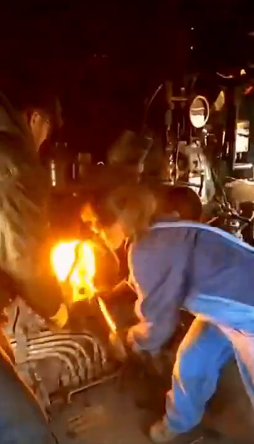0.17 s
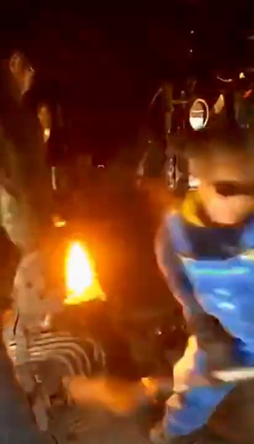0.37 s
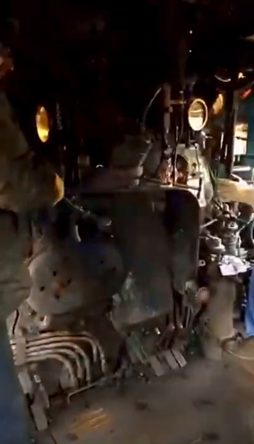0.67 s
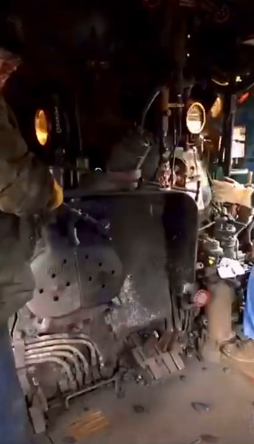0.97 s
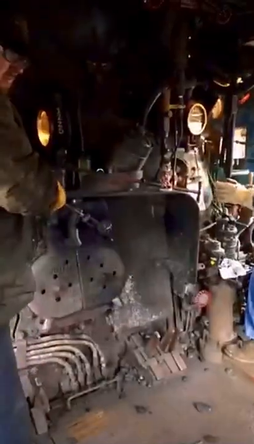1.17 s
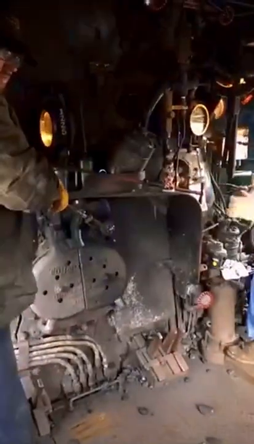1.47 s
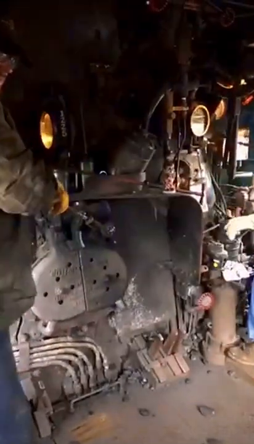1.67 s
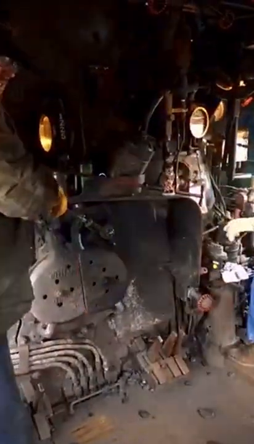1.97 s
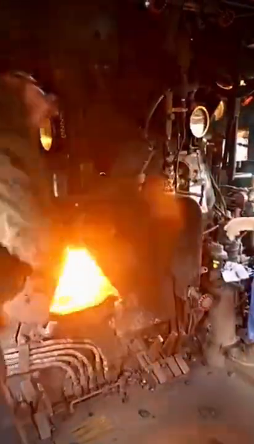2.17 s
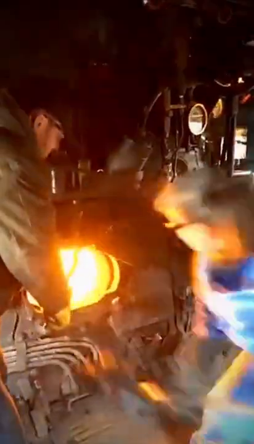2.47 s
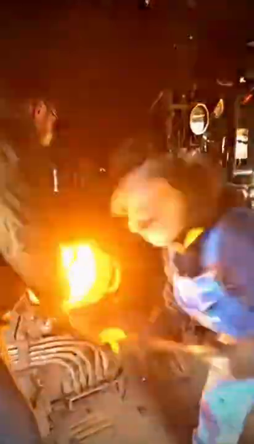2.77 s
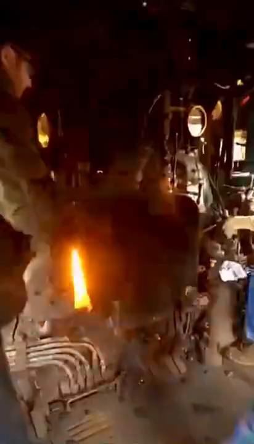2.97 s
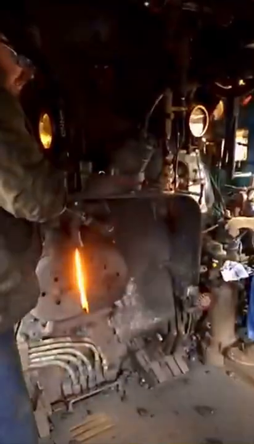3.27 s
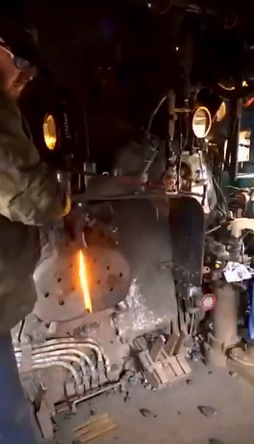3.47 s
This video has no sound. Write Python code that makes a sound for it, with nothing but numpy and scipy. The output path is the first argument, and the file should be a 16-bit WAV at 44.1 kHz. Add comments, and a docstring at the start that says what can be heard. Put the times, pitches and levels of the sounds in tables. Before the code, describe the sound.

Bright rushing hiss from an open locomotive firebox, cut off by clanking doors, amid shovel scrapes

```python
"""In the cab of a steam locomotive the fire doors stand open at first: the draught hisses brightly (shaped noise) and
the shovel scrapes in coal (grit coloured by a ringing blade), until the iron doors clank shut (noisy blows on ringing
modes). More scraping follows, then dull knocks (noise bursts, low thumps). The doors clank open, the draught returns
for another scrape, they clank shut; a thin, faint high tone (narrow noise) and a last scrape follow. Throughout, steam
leaks (noise, fuzzy whistles) and the cab rumbles (low noise); short echoes of the steel cab follow blows and grit."""
import sys
import numpy as np
from scipy import signal
from scipy.fft import rfft, irfft
from scipy.io import wavfile
from scipy.ndimage import uniform_filter1d

SR = 44100
rng = np.random.default_rng(int(sys.argv[2]) if len(sys.argv) > 2 else 0)


def master_out(mix):
    """Clip the mix to full scale and print it as 16-bit PCM to the path in sys.argv[1]."""
    frames = np.transpose(np.atleast_2d(mix))
    ceiling = np.clip(frames, -1, 1)
    pcm = np.round(ceiling * 32767).astype(np.int16)
    wavfile.write(sys.argv[1], SR, pcm)


N = 159642  # length in samples


def draught():
    """Air rushing through the open fire doors makes a smooth, bright hiss."""
    # One curve for each opening of the doors: (time [s], level [dB])
    draught_levels = [
        [(0, -31.5), (.15, -31), (.31, -32), (.33, -30.5), (.43, -31.5), (.47, -35.5), (.54, -47)],
        [(2.11, -41), (2.13, -31.5), (2.22, -29.5), (2.27, -32.5), (2.29, -30.5), (2.6, -32), (2.79, -31.5),
         (2.82, -30.5), (2.97, -31), (3.05, -44.5)],
    ]
    # Spectrum of the rushing air: (frequency [Hz], relative density [dB per Hz])
    draught_colour = [(400, -27.5), (900, -5), (2500, -5), (3300, -0.5), (5900, 3), (10300, 4), (11200, 4)]
    air = hiss(draught_colour, patchy_db=1.2, flicker_db=0.6, size=512)
    return air * sum(level(opening) for opening in draught_levels)


def clanks():
    """A rough blow and the rattle after it drive the modes of the doors, inside a dense crash of iron."""
    # Iron doors struck and rebounding:
    # (time [s], level [dB], brightness [dB per octave], extra level of the deepest ring [dB])
    door_blows = [(0.5458, -28.5, -1.5, -16), (.571, -40.5, -2, -6), (2.0411, -32.5, 1, 1),
                  (2.0475, -28.5, -2.5, 5.5), (2.07, -39, -2, 5), (3.0517, -25.5, 0.5, -26),
                  (3.072, -34.5, -5.5, -10), (3.097, -44, 4, -10)]
    # Ringing modes of the doors: (frequency [Hz], relative level [dB], time to fade by 60 dB [s])
    door_modes = [(388, -10, .06), (555, -11, .05), (805, -8, .035), (945, 0.5, .048), (1190, -4, .045),
                  (1355, 1.5, .04), (1600, -2, .035), (1820, -2.5, .045), (2140, -6, .035), (2680, -8, .04),
                  (3210, -8, .045), (3490, -7, .035)]
    # Spectrum of the crash: (frequency [Hz], relative density [dB per Hz])
    crash_colour = [(300, -26), (900, 10), (1800, 13.5), (3500, 4.5), (6000, 0.5), (11200, -11.5)]
    blow_s, rattle_s = 0.0045, 0.0069  # time to the peak of each
    rattle_db, crash_db = -16, -1.5  # rattle against blow, crash against ring
    deep_hz = 480  # the deepest ring lies below this
    out = np.zeros(N)
    t = np.arange(SR // 4) / SR
    for start_s, level_db, tilt_db, deep_db in door_blows:
        def tone(hz):
            return tilt_db * np.log2(hz / 1000) + deep_db * (hz < deep_hz)

        # uneven contacts, one every 128 samples (3 ms)
        strengths = rng.uniform(0.3, 1, len(t) // 128 + 1)
        contacts = evened(np.repeat(strengths, 128)[:len(t)])
        push = swell(t, blow_s) + amp(rattle_db) * swell(t, rattle_s) * contacts
        ring = 0
        for hz, mode_db, t60 in door_modes:
            mode = amp(mode_db + tone(hz) - 60 * t / t60) * np.sin(2 * np.pi * hz * t)
            rough_push = push * rng.standard_normal(len(t))
            struck = signal.fftconvolve(rough_push, mode)[:len(t)]
            ring += struck * np.linalg.norm(mode) / np.linalg.norm(struck)
        ring *= np.linalg.norm(push) / np.linalg.norm(ring)  # as much energy as the push
        toned_colour = [(hz, density_db + tone(hz)) for hz, density_db in crash_colour]
        crash = push * coloured(toned_colour, count=len(t))
        add(out, start_s, amp(level_db) * (ring + amp(crash_db) * crash))
    return out


def scrape():
    """Grains of grit of uneven size, coloured by the blade; its ring moves through the stroke."""
    # Strokes of the shovel through coal, one list each:
    # (time [s], level [dB], ring of the blade [Hz], relative height of the ring [dB])
    strokes = [
        [(.06, -49, 900, -11), (.175, -37, 1550, 9), (.235, -37.5, 1280, 8), (.29, -48, 1200, -3)],
        [(.865, -46, 900, -6), (.89, -35.5, 1000, 1), (.925, -32, 1600, 2.5), (.99, -34, 1140, -1),
         (1.06, -38.5, 780, 11), (1.11, -49.5, 800, 0)],
        [(2.595, -39, 900, 11), (2.615, -37.5, 1000, 6), (2.637, -37.5, 1900, 3), (2.665, -35, 2010, 9),
         (2.69, -38.5, 1380, 7)],
        [(3.38, -59, 1490, 9), (3.43, -39.5, 1800, 2), (3.5, -36, 1090, -1.5), (3.57, -40, 1500, 11),
         (3.62, -47, 1000, 4)],
    ]
    # Spectrum beneath the ring: (frequency [Hz], relative density [dB per Hz])
    scrape_colour = [(250, -0.5), (500, -6.5), (700, 1.5), (1800, -0.5), (3000, -3.5), (6000, -9.5),
                     (11200, -16)]
    grit_per_s, grit_spread_db, ring_octaves = 4000, 2.5, 0.42
    sizes = amp(grit_spread_db * np.minimum(rng.exponential(1, N), 4))
    lands = rng.random(N) < grit_per_s / SR
    grit = sizes * lands * rng.choice([-1, 1], N)
    hz, t, spectra = signal.stft(grit + cab(grit), SR, nperseg=256)
    point_s, _, ring_hz, ring_db = np.concatenate(strokes).T
    # distance of each band from the moving ring, in widths of the ring
    off = np.log2((hz[:, None] + 1) / np.interp(t, point_s, ring_hz)) / ring_octaves
    ring_height_db = np.interp(t, point_s, ring_db) * np.exp(-off ** 2)
    gain = amp(read(scrape_colour, hz)[:, None] + ring_height_db)
    spectra *= gain / np.sqrt(np.mean(gain ** 2, axis=0))
    scraping = evened(signal.istft(spectra, SR, nperseg=256)[1][:N])
    return scraping * sum(level(stroke) for stroke in strokes)


def knocks():
    """Doors, running gear and shovel knock: a dull burst of noise with a low thump that dies away."""
    # Knocks: (time [s], level of the burst [dB], starting level of the thump [dB], thump frequency [Hz])
    knock_list = [(1.281, -54, -35.5, 185), (1.405, -39, -39, 106), (1.518, -38.5, -30.5, 108),
                  (1.78, -38.5, -33, 175.5), (1.872, -36.5, -40, 125), (2.037, -40, -31, 73),
                  (2.113, -36.5, -40, 97), (2.286, -41, -46, 151), (2.617, -37, -33, 734)]
    # Spectrum of the burst: (frequency [Hz], relative density [dB per Hz])
    knock_colour = [(300, 3.5), (600, 4), (1200, 3.5), (2200, -3.5), (4000, -8.5), (11200, -27)]
    rise_s, thump_t60 = 0.015, 0.16  # seconds to the burst's peak, and for the thump to fade by 60 dB
    out = np.zeros(N)
    t = np.arange(SR // 4) / SR
    for start_s, burst_db, thump_db, thump_hz in knock_list:
        thump = amp(thump_db - 60 * t / thump_t60) * np.sin(2 * np.pi * thump_hz * t)
        burst = amp(burst_db) * swell(t, rise_s) * coloured(knock_colour, count=len(t))
        add(out, start_s, burst + thump)
    return out


def steam_and_high_tone():
    """Leaking steam hisses and whistles fuzzily; apart from it, narrow noise makes a thin, faint high tone."""
    # Steam leaking in the cab: (time [s], level [dB])
    steam_levels = [(0, -44.5), (.5, -47), (.6, -49), (.66, -52.5), (.68, -48), (.86, -46.5), (1.0, -47),
                    (1.14, -44), (1.5, -41.5), (1.65, -41.5), (2.03, -43), (2.1, -39), (2.3, -48.5),
                    (3.03, -42.5), (3.09, -46), (3.2, -51), (3.23, -45), (3.37, -46.5), (3.39, -40),
                    (3.44, -46), (3.53, -43.5), (3.56, -33.5), (3.62, -41.5)]
    # Spectrum of the leaks: (frequency [Hz], relative density [dB per Hz])
    steam_colour = [(250, -6.5), (340, -7), (570, -4), (990, -6.5), (1930, -10), (3000, -9), (5900, -10),
                    (7300, -13.5), (11200, -12.5)]
    # Three whistles of the steam, then the thin, faint high tone apart from the steam:
    # (frequency [Hz], width [Hz], level [dB], start [s], end [s])
    fuzzy_tones = [(565, 50, -58, .6, 2.05), (1130, 30, -59, .67, 2.0), (2930, 45, -60, 1.75, 2.04),
                   (10013, 12, -65, 3.08, 3.62)]
    out = hiss(steam_colour, patchy_db=1.0, flicker_db=1.0, size=512) * level(steam_levels)
    t = np.arange(N) / SR
    for hz, width_hz, level_db, start_s, end_s in fuzzy_tones:
        r = np.exp(-np.pi * width_hz / SR)
        noise = [1, 1j] @ rng.standard_normal((2, N))
        fuzz = signal.lfilter([1], [1, -2 * r, r * r], noise)
        gate = np.clip(np.minimum(t - start_s, end_s - t) / 0.048, 0, 1)  # 48 ms fades
        fuzzy_tone = evened((fuzz * np.exp(2j * np.pi * hz * t)).real)  # fuzz moved up to the pitch
        out += amp(level_db) * gate * fuzzy_tone
    return out


def rumble():
    """Frames and fire give a low roar of shaped noise, over a deeper sway."""
    # Rumble of frames and fire: (time [s], level [dB])
    rumble_levels = [(0, -52.5), (.5, -48.5), (.85, -44), (1.0, -45.5), (1.21, -50.5), (1.31, -40.5),
                     (1.53, -38), (1.66, -38), (1.76, -44.5), (1.85, -36.5), (2.03, -43), (2.13, -36.5),
                     (2.24, -48.5), (2.39, -47.5), (2.47, -49.5), (2.95, -48), (3.2, -51.5), (3.4, -44.5),
                     (3.58, -37.5), (3.62, -42)]
    # Spectrum of the rumble: (frequency [Hz], relative density [dB per Hz])
    rumble_colour = [(45, -10), (90, 3.5), (125, 2), (200, 0), (270, -7), (340, -15)]
    # Deepest bass: (time [s], level [dB])
    sway_levels = [(0, -56), (.27, -56), (.32, -44), (.37, -56), (.9, -54), (1.9, -52), (2.1, -47),
                   (2.25, -59), (3.62, -61)]
    sway = hiss([(22, 0), (45, -2)], patchy_db=1.5, flicker_db=1.8, size=4096) * level(sway_levels)
    roar = hiss(rumble_colour, patchy_db=1.5, flicker_db=1.3, size=2048) * level(rumble_levels)
    return roar + sway


def cab(x):
    """Dense short echoes of the steel cab: random clicks, fading, that each repeat the sound."""
    echo_db, echo_t60 = -12, 0.11  # overall level, seconds to fade by 60 dB
    t = np.arange(SR // 2) / SR
    signs = rng.choice([-1., 1.], len(t))
    lands = rng.random(len(t)) < 0.05
    tail = signs * lands * amp(-60 * t / echo_t60) * (t > 0.003)  # no echo in the first 3 ms
    return amp(echo_db) * signal.fftconvolve(x, tail / np.linalg.norm(tail))[:N]


def hiss(colour, patchy_db, flicker_db, size):
    """Random short-time spectra with drifting patches and a flicker shared by all bands."""
    hz = np.fft.rfftfreq(size, 1 / SR)
    frames = 4 * N // size + 5
    real, imag, patches = rng.standard_normal((frames, len(hz), 3)).T
    patches = uniform_filter1d(patches, size=size // 64, axis=0)  # smooth across bands
    patches = evened(uniform_filter1d(patches, size=8192 // size, axis=1))  # smooth in time
    flicker = evened(uniform_filter1d(rng.standard_normal(frames), size=3))
    gain = amp(read(colour, hz)[:, None] + patchy_db * patches + flicker_db * flicker)
    spectra = (real + 1j * imag) * gain
    return evened(signal.istft(spectra, nperseg=size, noverlap=3 * size // 4)[1][:N])


def coloured(colour, count):
    """Steady noise shaped by a spectrum table, at an RMS level of 1."""
    gain = amp(read(colour, np.fft.rfftfreq(count, 1 / SR)))
    return evened(irfft(rfft(rng.standard_normal(count)) * gain, count))


def swell(t, peak_s):
    """Rises softly to 1 at peak_s and dies away."""
    return (t / peak_s) ** 1.5 * np.exp(1.5 * (1 - t / peak_s))


def read(points, hz):
    """Spectrum table on a log axis, falling steeply outside its ends."""
    table_hz, table_db = np.transpose(points)
    octave = np.log2(hz + 1)
    inside = np.interp(octave, np.log2(table_hz), table_db)
    below = np.maximum(np.log2(table_hz[0]) - octave, 0)
    above = np.maximum(octave - np.log2(table_hz[-1] * 0.887), 0)  # starts just before the last point
    return inside - 30 * below - 30 * above  # 30 dB per octave


def level(table):
    """Gain along a curve of (time [s], level [dB]); practically silent outside it."""
    rows = np.array(table)
    return amp(np.interp(np.arange(N) / SR, rows[:, 0], rows[:, 1], left=-120, right=-120))


def amp(db):
    """Decibels to a plain gain."""
    return 10 ** (np.asarray(db) / 20)


def evened(x):
    """Scale to an RMS level of 1."""
    return x / np.sqrt(np.mean(x ** 2) + 1e-20)


def add(mix, start_s, sound):
    """Add a sound into the mix at its start time, cut off at the end."""
    part = mix[round(start_s * SR):][:len(sound)]
    part += sound[:len(part)]


def scene():
    """All the sources together, the same in both channels."""
    hits = clanks() + knocks()
    mix = draught() + steam_and_high_tone() + rumble() + scrape() + hits + cab(hits)
    return np.tile(mix, (2, 1))


def record(dry):
    """The top drops by a step, then the band limit cuts off what lies above."""
    drop_hz, drop_db, edge_hz = 11230, -42, 11880

    def low(x, hz):
        taps = signal.firwin(1023, hz, window=("kaiser", 9), fs=SR)
        return signal.oaconvolve(x, taps[None], "same")

    stepped = amp(drop_db) * dry + (1 - amp(drop_db)) * low(dry, drop_hz)
    return low(stepped, edge_hz)


dry = scene()
out = record(dry)
master_out(out)
```